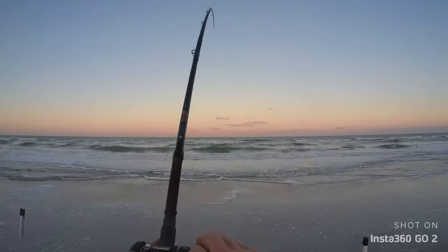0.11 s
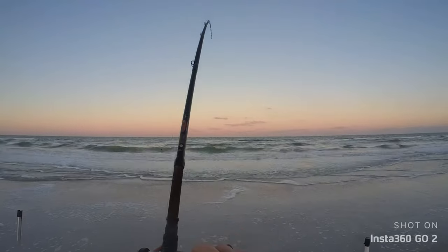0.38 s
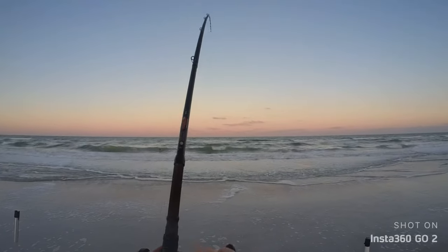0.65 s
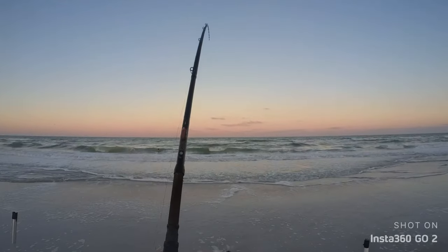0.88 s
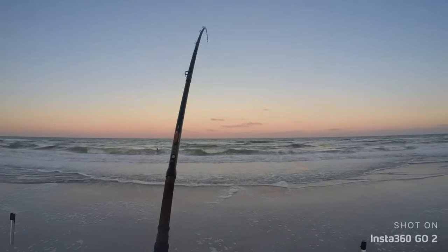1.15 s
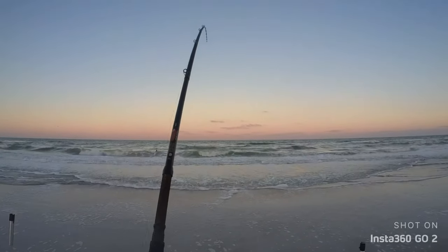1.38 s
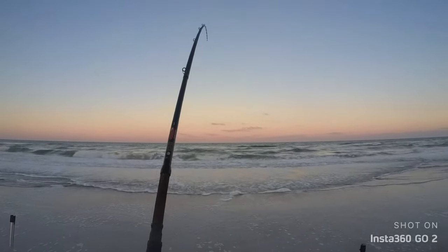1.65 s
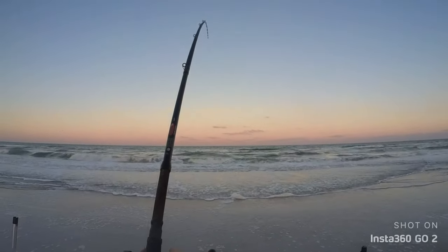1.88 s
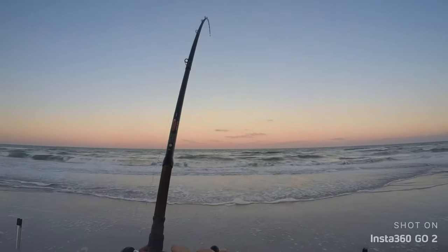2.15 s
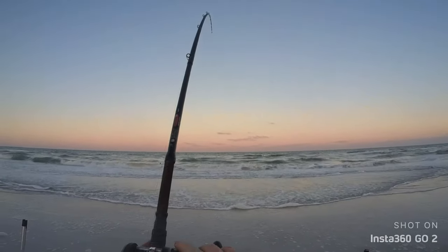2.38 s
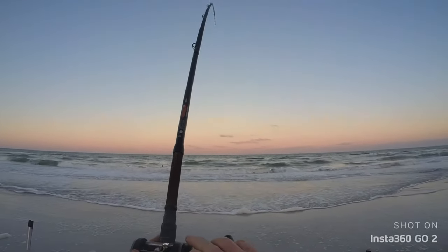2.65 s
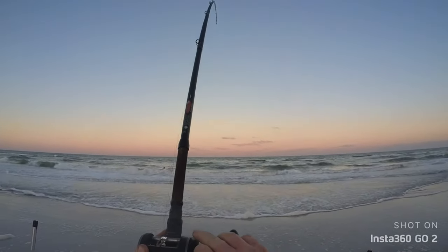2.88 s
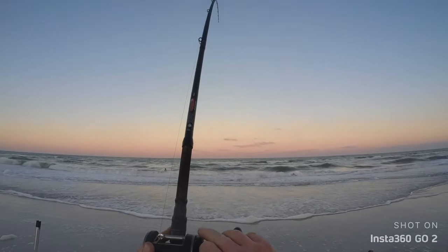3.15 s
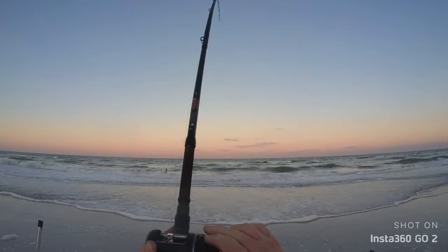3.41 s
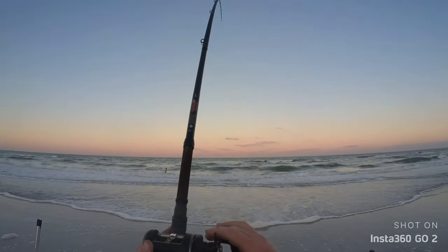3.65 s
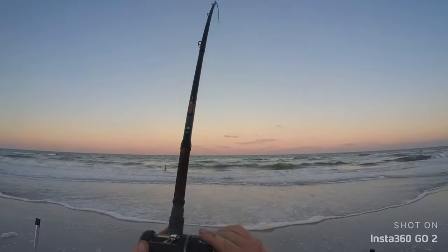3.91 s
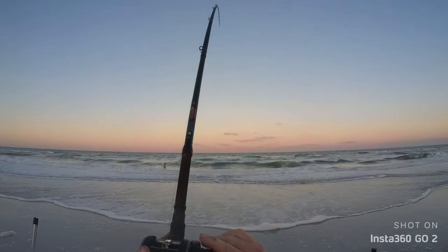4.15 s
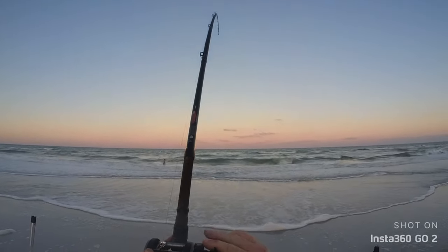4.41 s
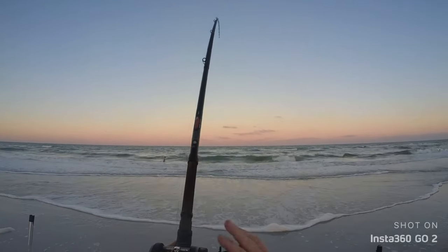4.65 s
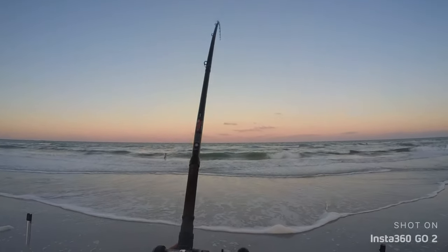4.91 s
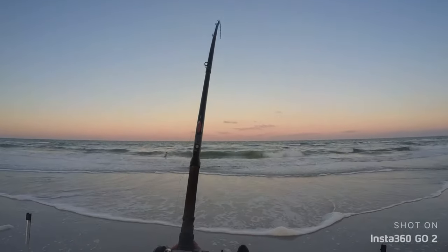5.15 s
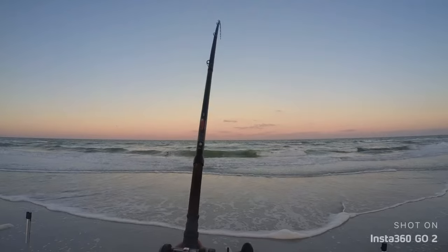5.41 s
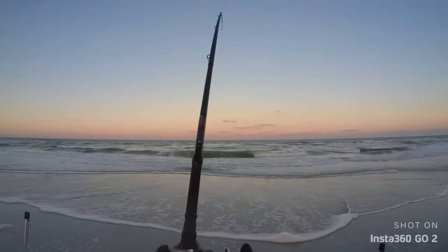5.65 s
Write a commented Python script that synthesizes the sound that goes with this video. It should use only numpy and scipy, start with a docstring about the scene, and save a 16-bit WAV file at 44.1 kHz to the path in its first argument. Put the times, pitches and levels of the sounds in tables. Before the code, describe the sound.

Rapid hard clicks from a spinning reel dominate, very near and dry. They race in several early bursts, settle to a moderate rattle, slow to separate ticks just before four seconds, and surge unevenly to the end. Soft low wind lumps and small thumps show through when the reel slackens, with distant surf as an even background wash in open air, one mono microphone.

```python
"""A fish strips line off a reel on a beach: a sprung pawl clicks over the nine teeth of the spool's ratchet,
from single clicks up to a buzz as the pull surges. Each click strikes damped modes of the reel's parts;
noise that follows the spool's speed gives its whir and the hiss of the line.
Wind is lumpy low noise with short decaying sine thumps; far surf is slowly swelling noise."""
import sys
import numpy as np
from scipy import signal
from scipy.fft import rfft, irfft, next_fast_len
from scipy.io import wavfile
from scipy.ndimage import uniform_filter1d, minimum_filter1d, map_coordinates

SR = 44100
rng = np.random.default_rng(int(sys.argv[2]) if len(sys.argv) > 2 else 0)


def undo_db(level):
    """Turn decibels back into plain size, where 20 dB means ten times bigger."""
    steps = np.asarray(level, float) / 20
    return 10 ** steps


def persist_wave(psi):
    """Save psi, clipped to +-1, as 16-bit WAV."""
    counts = np.round(np.clip(psi, -1, 1) * 32767).astype(np.int16)
    wavfile.write(sys.argv[1], SR, np.atleast_2d(counts).T)


N = 255161
USUAL_TEETH_PER_S = 300
INERTIA_SAMPLES = 880  # the spool follows the pull over this span


def unit(x):
    """Scale to rms 1."""
    return x / np.sqrt(np.mean(x ** 2) + 1e-20)


def curves(rows):
    """One value per sample for each column after the time."""
    s, *cols = np.transpose(rows)
    return [np.interp(np.arange(N) / SR, s, c) for c in cols]


def wobble(knots_per_s):
    """A smooth random curve."""
    knots = rng.standard_normal(int(N * knots_per_s / SR) + 4)
    return map_coordinates(knots, [np.arange(N) * knots_per_s / SR])


def filtered(x, response):
    """x times a complex response of frequency."""
    m = next_fast_len(N + 8192)
    return irfft(rfft(x, m) * response(np.fft.rfftfreq(m, 1 / SR)), m)[..., :N]


def resonance(hz, width_hz):
    """Causal response of one damped mode."""
    return lambda f: 1j * f * width_hz / (hz * hz - f * f + 1j * f * width_hz)


def rush(spectrum, patchy_db):
    """Coloured noise of rms 1 with patches of random gain in time and frequency."""
    z = signal.stft(rng.standard_normal(N), nperseg=512)[2]
    field = uniform_filter1d(rng.standard_normal(z.shape), 4, 0)
    field = uniform_filter1d(field, 10, 1)
    noise = signal.istft(z * undo_db(patchy_db * unit(field)), nperseg=512)[1][:N]
    hz, db = np.transpose(spectrum)
    return unit(filtered(noise, lambda f: undo_db(np.interp(np.log(f + 1), np.log(hz), db))))


def pulses(at, size):
    """Band-limited blows placed between samples by a windowed sinc."""
    taps = np.floor(at)[:, None] + np.arange(-7, 9)
    offset = taps - at[:, None]
    shape = np.sinc(offset) * np.cos(np.pi * offset / 16) ** 2
    slots = np.clip(taps, 0, N).astype(int)
    return np.bincount(slots.ravel(), (size[:, None] * shape).ravel(), N + 1)[:N]


def struck(modes, at, size, scatter_db, scrape, contact_hz):
    """Every click rings each mode at a new strength; the pawl scrapes as it lands."""
    landing = filtered(pulses(at, size * scrape), lambda f: 1 / (1 + 1j * f / contact_hz) ** 2)
    grit = landing * rng.standard_normal(N) * np.sqrt(SR / contact_hz)
    sound = 0
    for k, (hz, width_hz, db) in enumerate(modes):
        strength = undo_db(scatter_db * rng.standard_normal(len(at)))
        blow = pulses(at, size * strength) + grit
        sound = sound + (-1) ** k * undo_db(db) * filtered(blow, resonance(hz, width_hz))
    return sound


def spool_speed():
    """Teeth per second: the pull smoothed twice by the spool's inertia, never backwards."""
    # Each row: time in seconds, pull in teeth per second.
    pull = [(0.0, 190.6), (0.05, 334.0), (0.118, 349.2), (0.338, 120.2), (0.388, 170.1), (0.47, 487.2),
            (0.572, 678.2), (0.678, 251.1), (0.762, 158.2), (0.9, 528.5), (1.002, 500.3), (1.038, 393.3),
            (1.122, 288.2), (1.23, 601.1), (1.312, 533.3), (1.378, 338.2), (1.504, 349.3), (1.548, 477.5),
            (1.712, 386.7), (1.82, 417.8), (1.948, 292.6), (2.062, 241.1), (2.202, 372.1), (2.348, 244.4),
            (2.518, 344.3), (2.644, 295.7), (2.688, 202.3), (2.792, 250.5), (2.828, 167.2), (2.998, 151.2),
            (3.022, 193.1), (3.662, 154.9), (3.865, -12.4), (3.882, 52.6), (3.932, 67.5), (4.07, 300.8),
            (4.17, 548.0), (4.274, 291.7), (4.4, 88.7), (4.468, 79.5), (4.66, 465.2), (4.762, 362.0),
            (4.788, 413.6), (4.844, 319.7), (4.952, 240.7), (4.996, 329.6), (5.152, 511.0), (5.22, 175.3),
            (5.258, 307.7), (5.332, 390.0), (5.43, 90.7), (5.6, 423.7), (5.722, 112.8), (5.79, 122.7)]
    speed = uniform_filter1d(curves(pull)[0], INERTIA_SAMPLES)
    return np.clip(uniform_filter1d(speed, INERTIA_SAMPLES), 0, None)


def ratchet(speed):
    """One click for each tooth that passes the pawl, ringing pawl, plate, edges, spring, spool, cup and frame."""
    # Each row is one tooth's wear: ring in dB, knock in dB, both before scaling by speed.
    teeth = [(1.2, -0.1), (-0.9, -0.3), (-1.6, 0.9), (0.2, 1.1), (1.0, -0.3), (-2.0, -0.9), (-0.7, 0.0),
             (1.1, 0.5), (1.7, -0.8)]
    # Mode tables, each row: frequency in Hz, width in Hz, relative level in dB.
    ring_modes = [(4972, 140, 15.5), (5780, 1270, 13), (5990, 1400, 5.5)]  # pawl and side plate
    edge_modes = [(7410, 550, 2.5), (9410, 750, -4), (9600, 380, -14.5), (12800, 2700, -21)]  # thin edges of the pawl, set off mostly by scraping
    spring_modes = [(3280, 1300, -7.5), (4505, 550, 5)]  # the pawl's spring
    spool_modes = [(2050, 52, 0)]  # the spool's long ring
    frame_modes = [(1560, 180, -1), (2000, 330, -4), (2514, 450, 7), (3335, 650, 5)]  # reel frame and rod
    cup_modes = [(2850, 2300, 0)]  # the cup that a deep fall sounds
    # Slow drift of the ratchet's level. Each row: time in seconds, ring in dB, knock in dB beside the ring.
    drift = [(0, -1.5, 1.5), (.1, -1, 3.5), (.25, 1, -1), (.45, -0.7, 0), (.6, -1.7, -2.5), (.85, .1, 4),
             (1.1, -1.1, 3.5), (1.35, -0.7, 0.5), (2.0, -0.5, 1), (2.5, -0.5, -0.5), (2.8, 0.35, -1.5),
             (3.6, 0.7, 1.5), (4.2, -0.2, -0.3), (4.8, 0, -0.5), (5.12, 0.5, 1), (5.3, -.5, 3),
             (5.55, 0.5, 3), (5.79, 1.3, 7.5)]
    deep_tooth = 2  # the pawl falls furthest behind this tooth
    first_tooth = .864  # part of a tooth already passed at the start

    passed = first_tooth + np.cumsum(speed) / SR
    tooth = np.arange(1, int(passed[-1]) + 1)
    at = np.interp(tooth, passed, np.arange(N))

    octaves = np.clip(np.log2(speed / USUAL_TEETH_PER_S + 1e-3), -1.2, None)  # no lower for single clicks
    rising = np.gradient(uniform_filter1d(octaves, 2 * INERTIA_SAMPLES)) * SR  # octaves per second
    # the frame knocks hardest at the speed where its modes fall on multiples of the click rate
    knock_peak_hz, knock_width_octaves = 343, 0.26
    in_step = np.exp(-(np.log2(speed / knock_peak_hz + 1e-3) / knock_width_octaves) ** 2)
    ring_drift_db, knock_drift_db = curves(drift)
    # the ring grows with speed, and further in the fastest runs
    ring_db = 2.5 * octaves + 1.4 * np.clip(octaves, 0, None) ** 2 + ring_drift_db
    # the constant drops out when the knock is scaled to its final level
    knock_db = -17 + 6.5 * in_step + 2.1 * octaves + 0.2649 * rising + knock_drift_db
    speed_then, ring_db, knock_db = (c[at.astype(int)] for c in (speed, ring_db, knock_db))

    # a slow pawl drops unevenly into each gap; a fast one skims the tips in stricter time
    loose = 1 / (1 + (speed_then / 290) ** 8)
    jitter_s = .000011 + .00002 * (speed_then / 600) ** 2 + .00005 * loose
    at = at - SR * .0013 + SR * jitter_s * rng.standard_normal(len(at))
    at = at + SR * .00006 * wobble(40)[np.clip(at, 0, N - 1).astype(int)]  # the drag slips a little

    tooth_index = tooth % len(teeth)
    worn_db = np.array(teeth)[tooth_index] * np.transpose([1.12 - 0.1 * loose, 1.6 + 0.73 * loose])
    share = np.clip(speed_then, 45, None) ** -.5  # more clicks share the same loudness
    ring_size = undo_db(ring_db + worn_db[:, 0]) * share
    knock_size = undo_db(ring_db + knock_db + worn_db[:, 1]) * share

    ring_at = at + SR * .000012 * rng.standard_normal(len(at))
    ring = struck(ring_modes, ring_at, ring_size, scatter_db=1.5, scrape=.4, contact_hz=450)
    edge = struck(edge_modes, at, ring_size, scatter_db=4.0, scrape=1.1, contact_hz=250)
    spring = struck(spring_modes, at, ring_size * (1.3 + 0.37 * loose),
                    scatter_db=3.0, scrape=0.93, contact_hz=420)
    spool = struck(spool_modes, at, ring_size * (3.3 + loose),
                   scatter_db=1.0, scrape=0.27 + 0.31 * loose, contact_hz=296)
    knock = struck(frame_modes, at, knock_size,
                   scatter_db=1 + 2 * loose, scrape=.15 + .45 * loose, contact_hz=350)
    deep = tooth_index == deep_tooth
    cup = struck(cup_modes, at[deep], (ring_size * loose)[deep], scatter_db=2.5, scrape=.3, contact_hz=300)

    # the side plate swells the ring and softens its rise
    ring = filtered(ring, lambda f: resonance(5500, 1350)(f) ** 3)
    knock = filtered(knock, lambda f: resonance(2500, 3600)(f) ** 2)
    spring = filtered(spring, lambda f: resonance(4200, 2600)(f) ** 2)
    spool = filtered(spool, resonance(2045, 900))
    cup = filtered(cup, resonance(2640, 1500))
    levels_db = [(-28.0, ring), (-39.5, knock), (-47.0, edge), (-38.5, spring), (-50.5, spool), (-53, cup)]
    return sum(undo_db(db) * unit(part) for db, part in levels_db)


def spool_whir(speed):
    """Whir of the spinning spool: coloured noise that grows with speed."""
    # Each row: frequency in Hz, relative density in dB.
    spectrum = [(760, -80), (1300, -8.5), (1590, -2), (1800, -63), (2600, 4), (3600, 0), (4730, 6.5),
                (5310, 8), (5720, 4), (6980, -5), (7750, -6.5), (14900, -55), (16000, -45)]
    swell = (speed / USUAL_TEETH_PER_S) ** 0.78 * undo_db(0.37 * wobble(4.1))
    return undo_db(-38.5) * swell * rush(spectrum, patchy_db=4.5)


def line_hiss(speed):
    """Hiss of the line through the rod rings: flickering treble noise that grows with speed."""
    # Each row: frequency in Hz, relative density in dB.
    spectrum = [(6000, -38), (8200, -2.5), (9600, -3), (10300, -6.5), (13500, -12), (15500, -10)]
    flicker = undo_db(2.3 * wobble(15) + 3.9 * wobble(35))
    swell = (speed / USUAL_TEETH_PER_S) ** 0.58 * flicker
    return undo_db(-61.5) * swell * rush(spectrum, patchy_db=3.0)


def reel():
    """Ratchet, whir and line hiss, all driven by one spool speed."""
    speed = spool_speed()
    return ratchet(speed) + spool_whir(speed) + line_hiss(speed)


def wind():
    """Turbulence buffets in lumps over a deeper rumble; single eddies land as short low thumps."""
    # Each row: time in seconds, buffet level in dB.
    gusts = [(0, -44.5), (.16, -39.5), (.3, -47), (.55, -49.5), (1.3, -46.5), (2.2, -44.5), (2.65, -44),
             (2.76, -41.5), (2.85, -45), (3.2, -41), (3.55, -40.5), (3.76, -42), (3.81, -37.5), (3.92, -37),
             (3.97, -42.5), (4.45, -44), (4.8, -46.5), (5.03, -44), (5.3, -45), (5.79, -45.5)]
    # Each row: start in seconds, level in dB before the shared gain and decay, frequency in Hz.
    thumps = [(.117, -17, 450), (.1207, -16.5, 680), (0.1278, -13, 340), (.137, -16.5, 273),
              (0.145, -18, 113), (2.755, -20, 125), (3.214, -25.5, 112), (3.308, -30, 196),
              (3.549, -23.5, 99), (3.706, -24.5, 151), (3.808, -20, 525), (3.826, -35, 201),
              (3.876, -20, 159), (3.904, -30, 201), (5.03, -33, 101)]
    # Spectra, each row: frequency in Hz, relative density in dB.
    buffet_spectrum = [(65, -12.5), (110, -6.5), (219, 2), (498, -3.5), (699, -17), (1020, -18.5),
                       (1200, -21), (1560, -46), (2640, -120)]
    rumble_spectrum = [(15, -54), (25, -40), (81, 3.5), (150, 5.5), (200, -36), (330, -120)]

    buffet_db, = curves(gusts)
    lumps = undo_db(0.43 * wobble(4.53) + 0.8 * wobble(12) + 2.1 * wobble(35))
    buffet = undo_db(buffet_db) * unit(lumps * rush(buffet_spectrum, patchy_db=0.5))

    mean_db = buffet_db.mean()
    rumble_db = mean_db - 8.5 + 1.74 * (buffet_db - mean_db)  # swings wider than the gusts
    rumble_lumps = undo_db(1.65 * wobble(7) + 4.4 * wobble(16))
    rumble = undo_db(rumble_db) * unit(rumble_lumps * rush(rumble_spectrum, patchy_db=2.3))

    sound = np.pad(buffet + rumble, (0, SR))
    t = np.arange(SR // 10) / SR
    for s, db, hz in thumps:
        turns = hz * t  # each eddy dies within a few turns
        eddy = np.sin(2 * np.pi * turns) * turns * np.exp(-1.8 * turns)
        sound[round(s * SR):][:len(t)] += undo_db(db + 9.0) * eddy
    return sound[:N]


def surf():
    """The far wash: coloured noise that swells slowly."""
    # Each row: frequency in Hz, relative density in dB.
    spectrum = [(350, -92), (600, -7.5), (944, -11), (1010, -12), (1550, -9.5), (1850, -7.5), (2340, -8),
                (2610, -10.5), (7310, -19.5), (16000, -96)]
    return undo_db(-47.0 + 0.13 * wobble(0.15) + 0.76 * wobble(1.48)) * rush(spectrum, patchy_db=4.0)


def scene():
    """Reel, wind and sea at one microphone."""
    return (reel() + wind() + surf())[None]


def ducked(x):
    """Wind suppressor: turns the bass down while the treble is loud, and up while it is quiet."""
    split_hz, window_s, pivot_db, bass_db_per_treble_db = 1840, 0.043, -26.5, -0.62
    treble = filtered(x, lambda f: 1 / (1 + (split_hz / (f + 1)) ** 6))
    power = uniform_filter1d(treble ** 2, round(window_s * SR))
    level_db = 10 * np.log10(np.abs(power) + 1e-9)
    bass_db = bass_db_per_treble_db * np.clip(level_db - pivot_db, -9, 9)
    return treble + (x - treble) * undo_db(bass_db)


def roll_off(x):
    """The treble ends steeply here."""
    return signal.sosfilt(signal.butter(12, 16480, fs=SR, output="sos"), x)


def record(dry):
    """The camera suppresses wind, cuts the deep bass and the top of the treble, and holds down the peaks."""
    low_cut_hz, top_hz, ceiling = 75, 15900, .2

    def band(f):
        u = f / low_cut_hz
        low_cut = (1j * u) ** 2 / (1 + 1.4j * u - u ** 2)
        return low_cut / (1 + (f / top_hz) ** 60)

    heard = filtered(ducked(dry), band)
    needed = ceiling / np.maximum(np.abs(heard), ceiling)
    gain = uniform_filter1d(minimum_filter1d(needed, size=61), size=41)
    mix = filtered(heard * gain, lambda f: f < top_hz)
    return roll_off(mix)


dry = scene()
out = record(dry)
persist_wave(out)
```